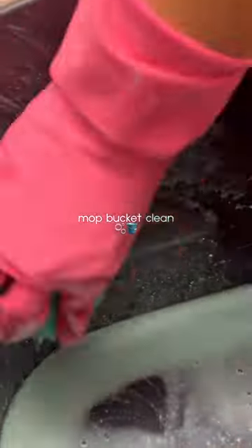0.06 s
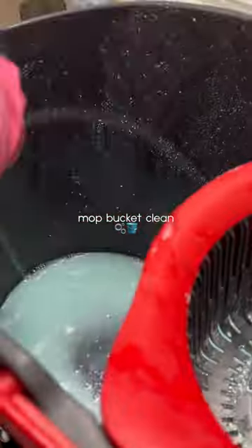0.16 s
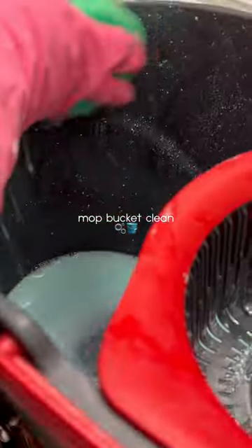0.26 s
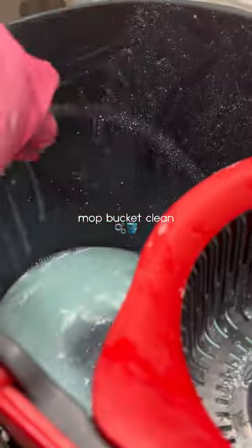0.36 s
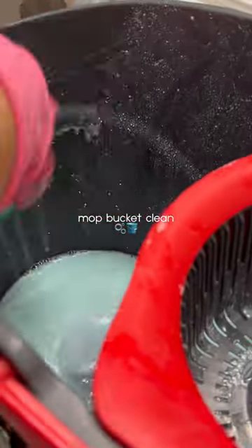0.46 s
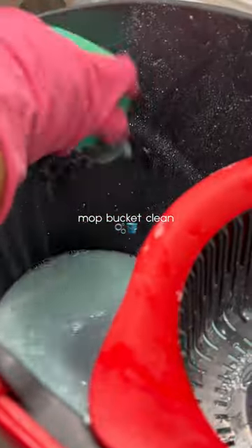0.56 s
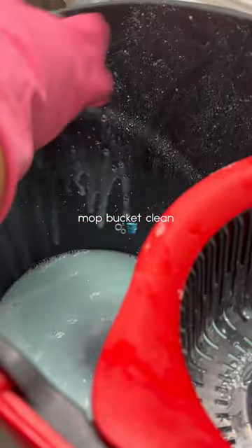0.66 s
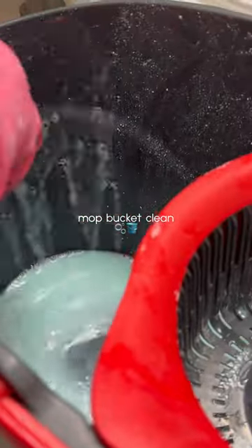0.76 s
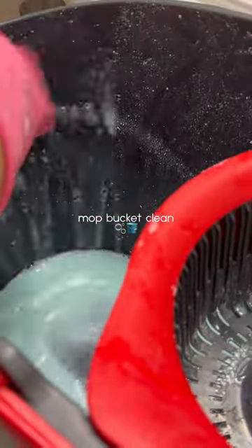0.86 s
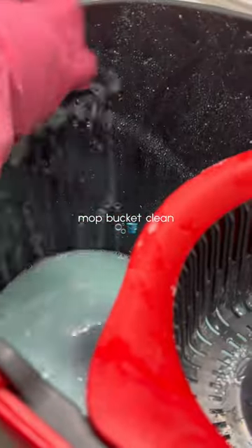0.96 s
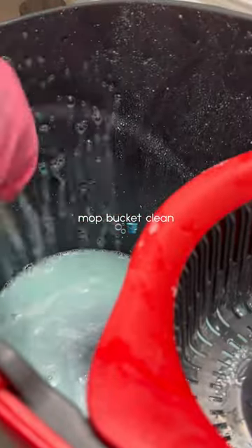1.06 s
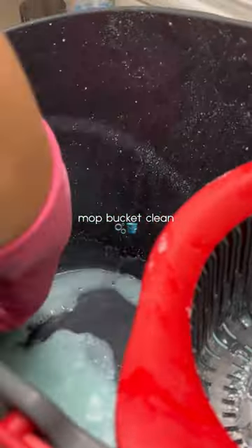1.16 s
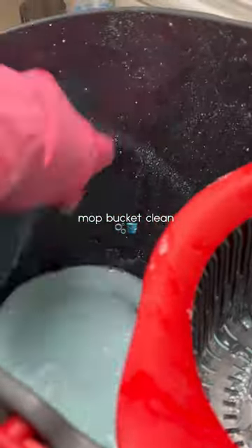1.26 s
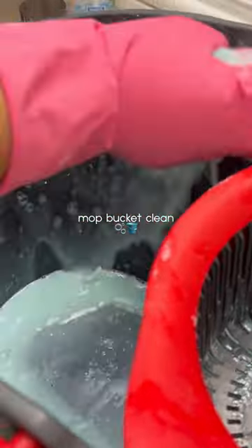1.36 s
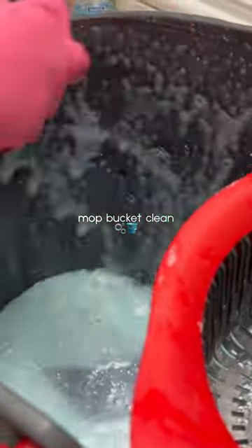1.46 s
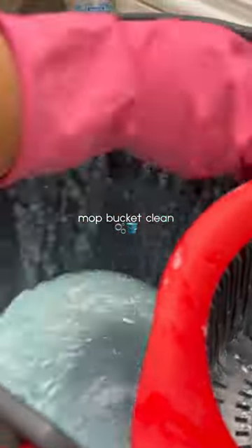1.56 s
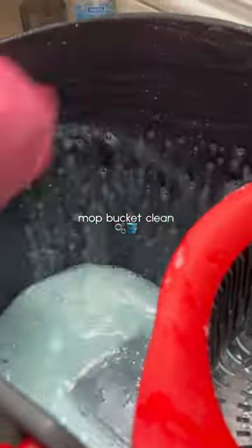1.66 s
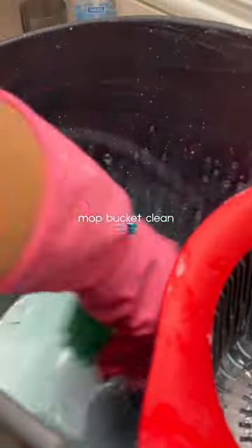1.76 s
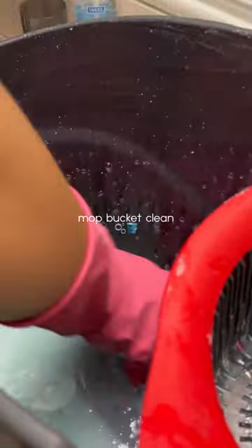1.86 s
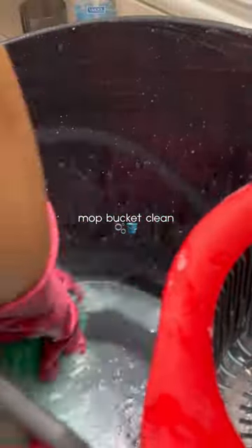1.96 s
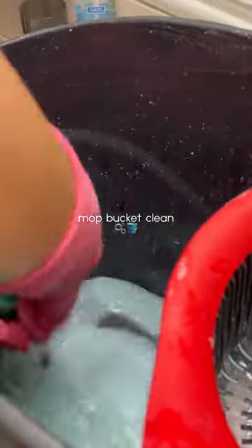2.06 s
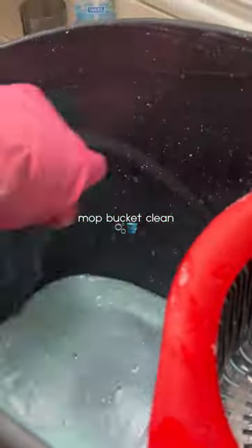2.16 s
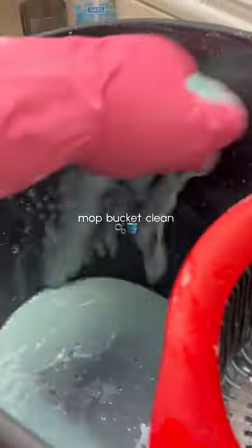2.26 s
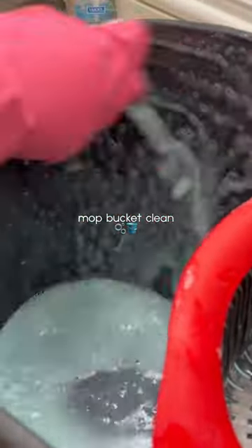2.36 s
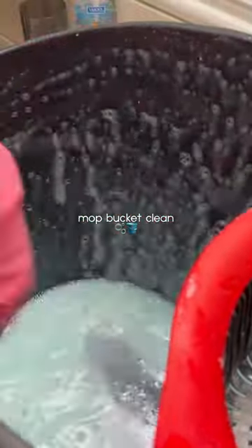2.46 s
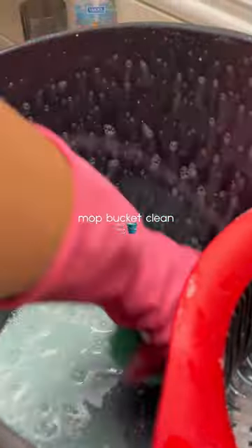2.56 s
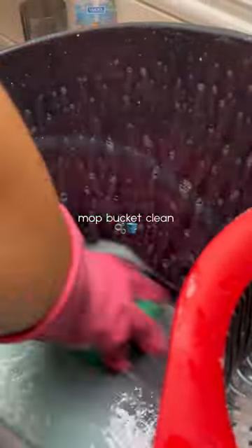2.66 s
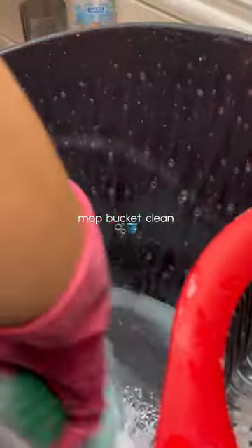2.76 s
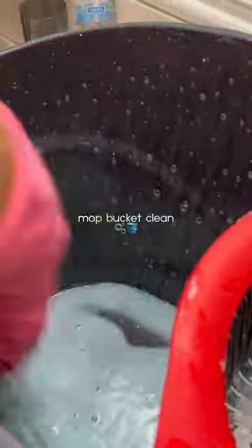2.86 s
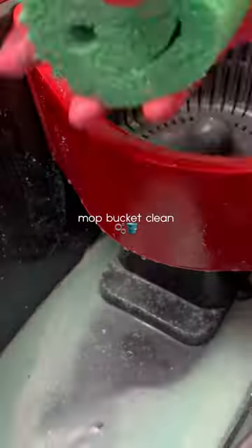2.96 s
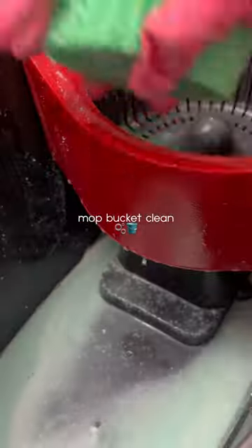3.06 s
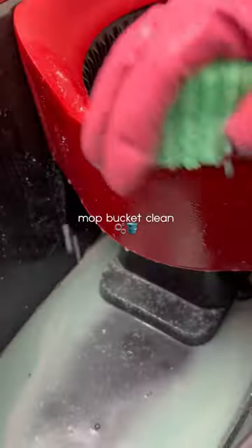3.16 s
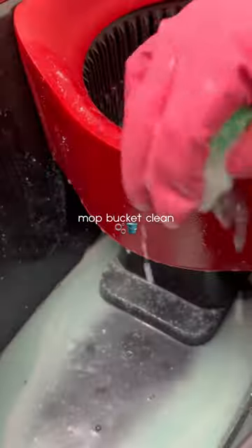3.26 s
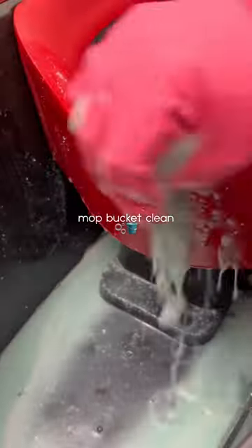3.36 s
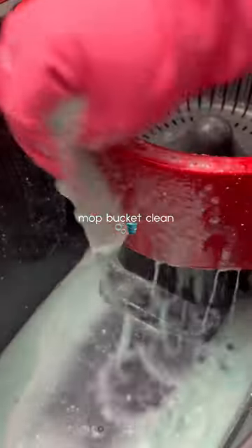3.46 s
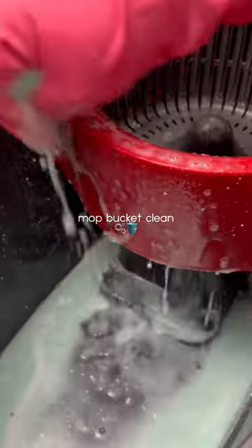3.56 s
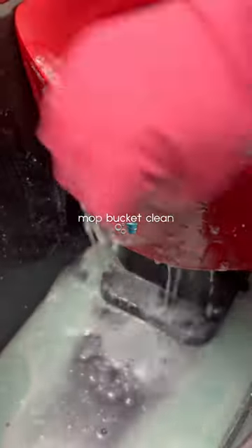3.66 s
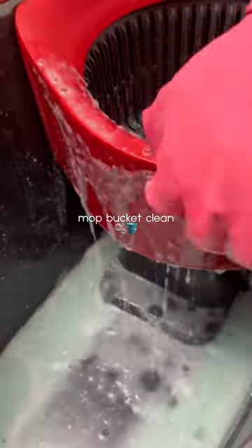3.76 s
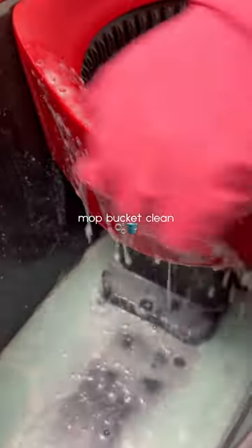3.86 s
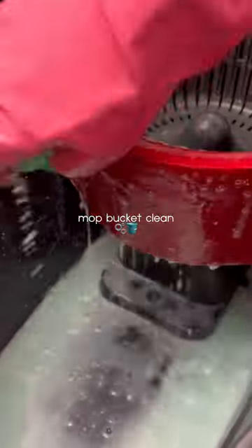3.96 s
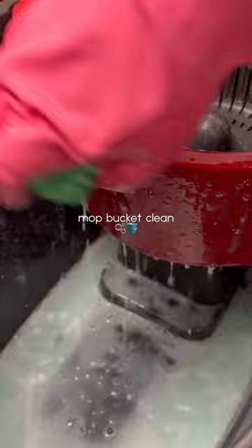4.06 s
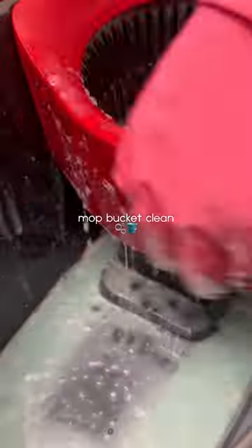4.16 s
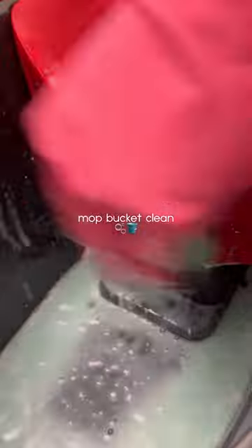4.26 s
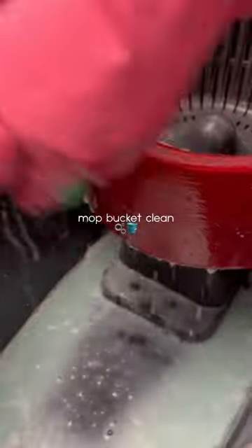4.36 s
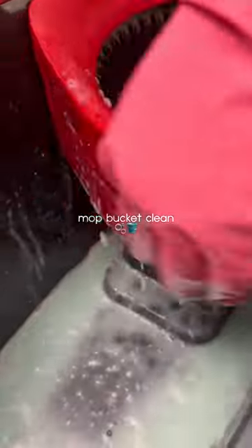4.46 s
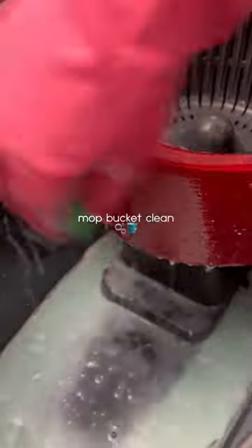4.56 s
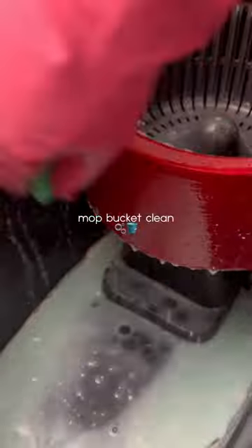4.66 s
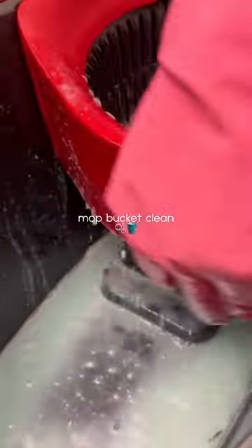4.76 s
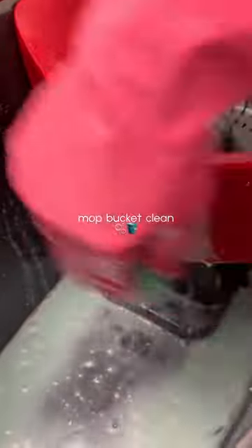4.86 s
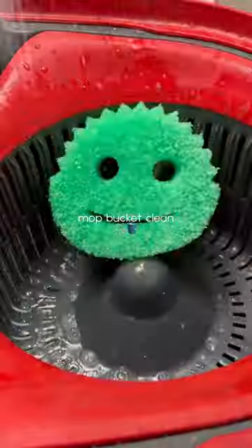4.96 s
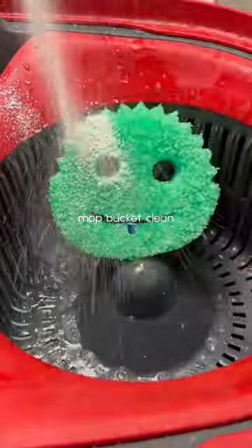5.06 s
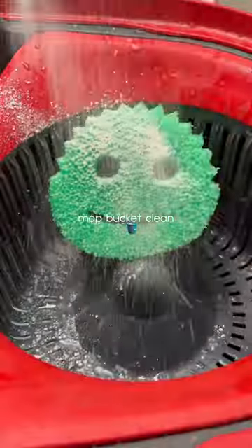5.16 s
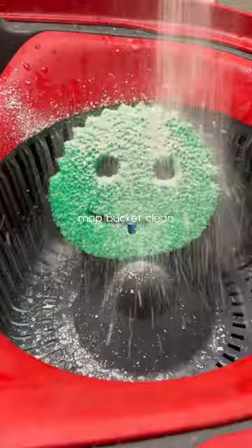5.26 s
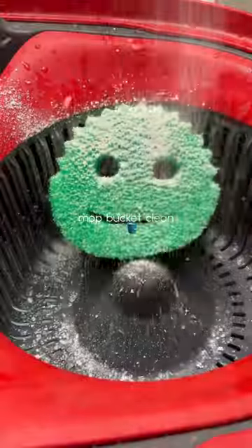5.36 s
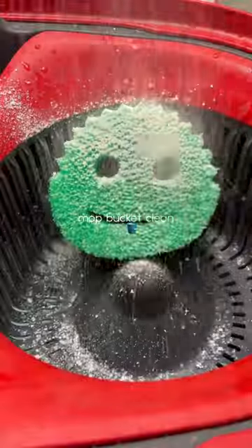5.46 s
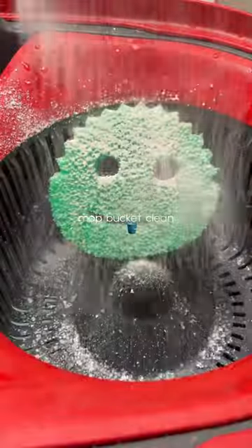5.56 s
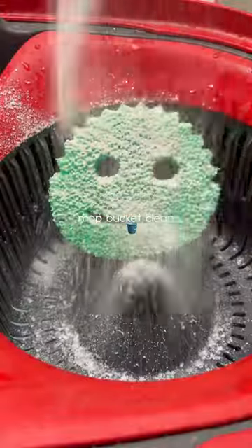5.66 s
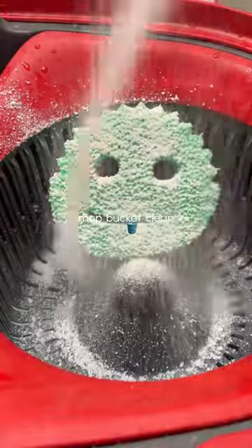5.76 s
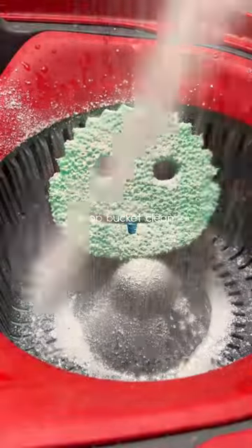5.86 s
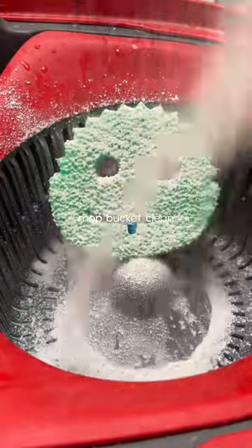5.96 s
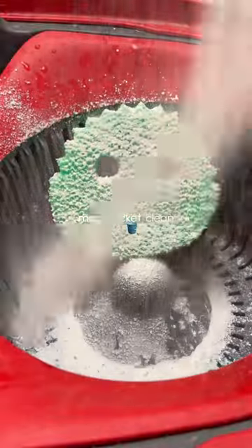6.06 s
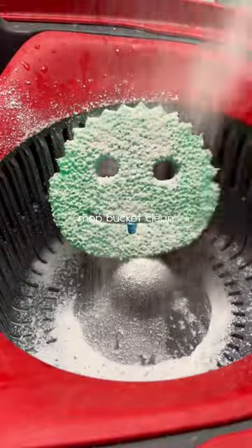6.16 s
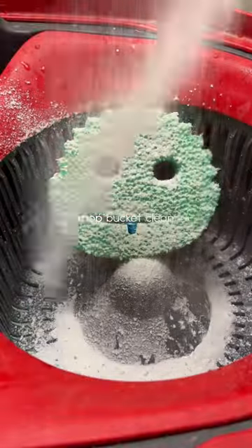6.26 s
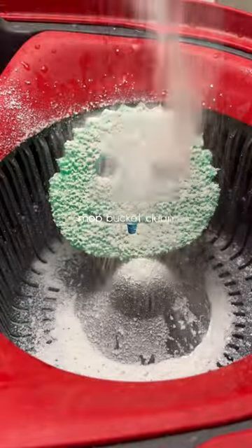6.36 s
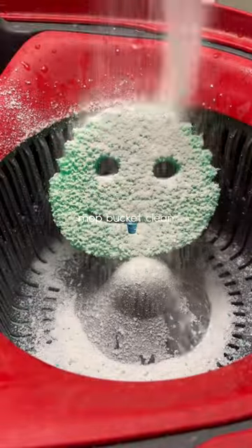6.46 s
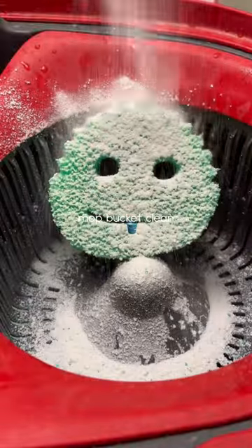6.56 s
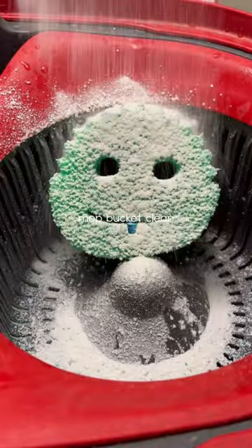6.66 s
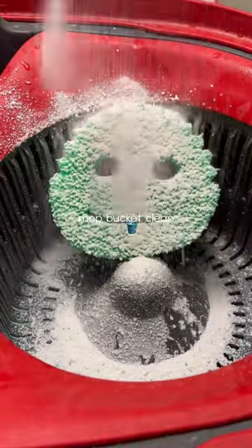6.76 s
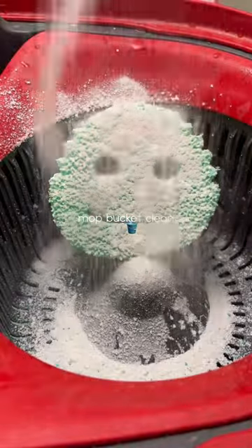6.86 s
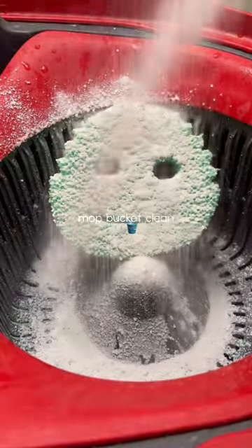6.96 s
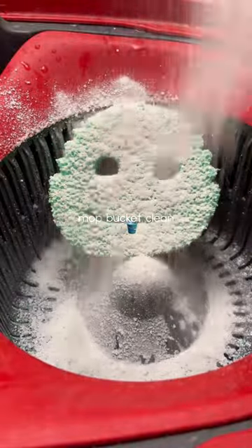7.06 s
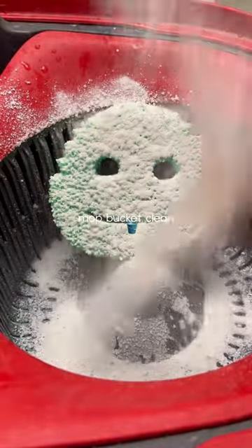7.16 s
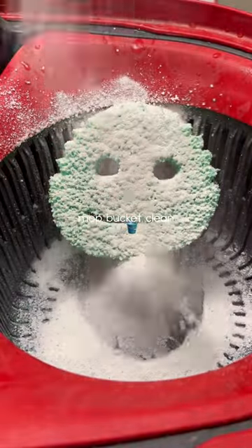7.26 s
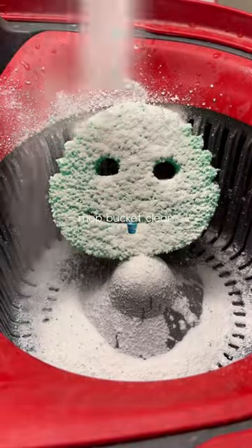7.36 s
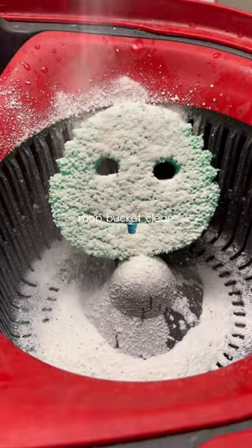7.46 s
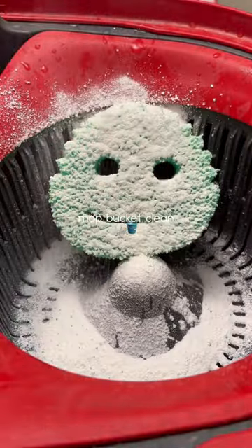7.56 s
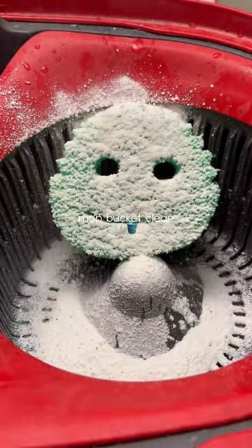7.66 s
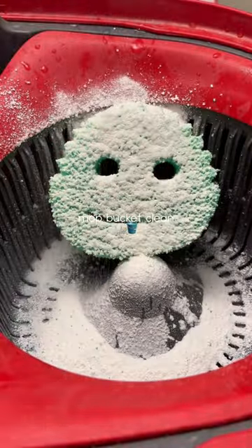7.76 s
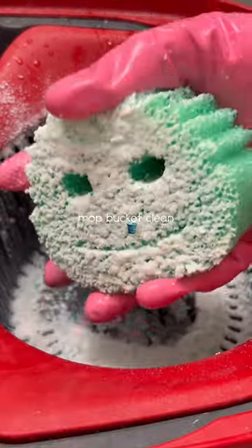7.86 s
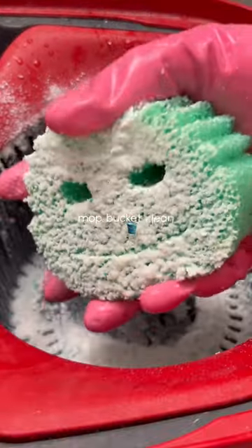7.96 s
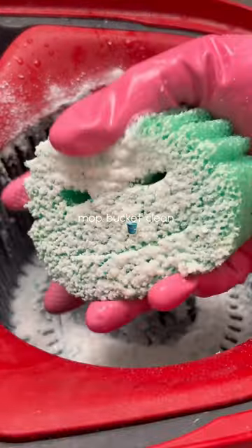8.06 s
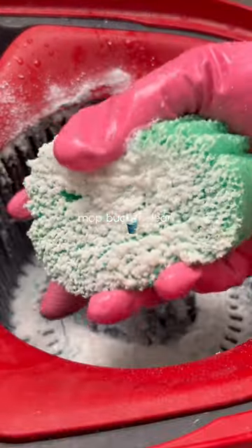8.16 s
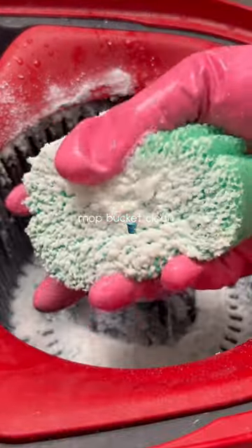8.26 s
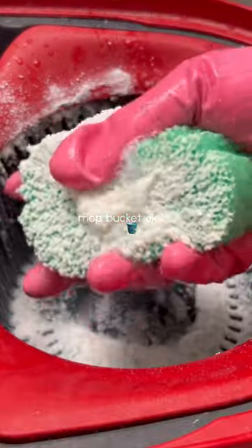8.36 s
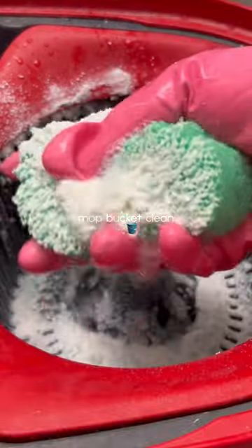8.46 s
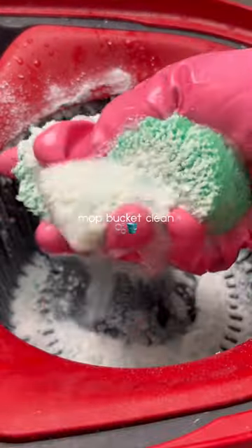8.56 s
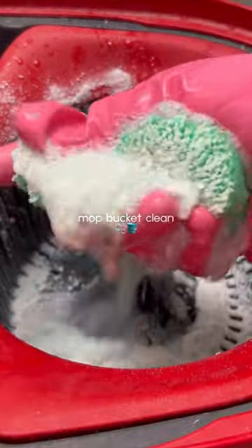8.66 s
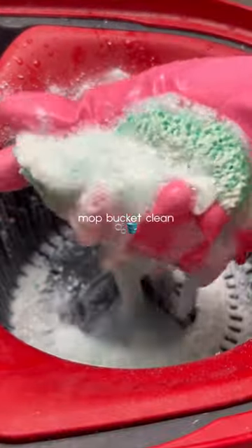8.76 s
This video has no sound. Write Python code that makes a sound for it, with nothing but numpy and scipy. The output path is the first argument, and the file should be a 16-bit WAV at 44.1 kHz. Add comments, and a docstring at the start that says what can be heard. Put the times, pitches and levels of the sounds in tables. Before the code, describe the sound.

Close in a small room, a coarse wet sponge scrubs a plastic bucket in fast uneven strokes, with hollow knocks, suds crackle and brief rubber-glove squeaks. Deeper, squelching scouring of the wringer follows, growing vigorous. After an abrupt dip, much quieter powder hisses and patters in shakes with tiny ticks over faint hum. Lastly the dusted sponge is squeezed, its crackling foam swelling.

```python
"""A coarse soapy sponge in a gloved hand scrubs a plastic mop bucket, close up in a small room,
in shots played at different speeds. It rasps and knocks on the wall, then scours the wringer, squelching.
Powder is shaken over it, and it is squeezed to crackling foam; a low hum joins these two parts.
Each rub is a shower of tiny random slips and hiss, coloured by the plastic under it.
Knocks are sums of bucket modes with a chirping crack; clicks and ticks are very short noise bursts."""
import sys
import numpy as np
from scipy import signal
from scipy.fft import rfft, irfft, next_fast_len
from scipy.io import wavfile
from scipy.ndimage import uniform_filter1d

SR = 44100
rng = np.random.default_rng(int(sys.argv[2]) if len(sys.argv) > 2 else 0)


def generate_wav(signal):
    """Clip the signal to [-1, 1] and save it as 16-bit WAV at the path in sys.argv[1]."""
    frames = np.transpose(np.atleast_2d(signal))
    scaled = np.clip(frames, -1, 1) * 32767
    pcm = np.round(scaled).astype(np.int16)
    wavfile.write(sys.argv[1], SR, pcm)


N = 388080
TIME = np.arange(N) / SR

# when each action goes on: (from [s], to [s])
SWIPING, SCRUBBING, SCOURING = (0, .126), (.126, 2.945), (2.945, 4.9)
POURING, SQUEEZING = (4.952, 7.77), (7.776, 8.8)


def amp(db):
    """Decibels to gain."""
    return 10 ** (np.asarray(db) / 20)


def evened(x):
    """Scales to rms 1."""
    return x / np.sqrt(np.mean(x ** 2) + 1e-20)


def read(points, hz):
    """Reads a table on a log-frequency axis."""
    f, value = np.transpose(points)
    return np.interp(np.log(hz + 1), np.log(f + 1), value)


def add(mix, s, sound):
    """Mixes a sound in at time s."""
    part = mix[max(round(s * SR), 0):][:len(sound)]
    part += sound[:len(part)]


def coloured(x, colour, peaks=(), size=2048):
    """Causal filter: a smooth spectrum with resonances on top, so that every click rings after it lands."""
    hz = np.fft.rfftfreq(size, 1 / SR)
    db = read(colour, hz)
    for f, width, lift in peaks:
        db = db + lift / (1 + (2 * (hz - f) / width) ** 2)
    log_gain = np.log(amp(np.r_[db, db[-2:0:-1]]))
    # minimum phase: the energy comes as early as this spectrum allows
    response = np.fft.ifft(np.exp(np.conj(signal.hilbert(log_gain)))).real
    return signal.oaconvolve(x, response)[:len(x)]


def wander(count, hz):
    """Random drift of rms 1, mostly slower than hz."""
    f = np.fft.rfftfreq(count, 1 / SR)
    return evened(irfft(rfft(rng.standard_normal(count)) / (1 + (f / hz) ** 4), count))


# playback speed of each shot, which scales bucket modes and port phase: (from [s], speed [ratio])
SHOT_SPEEDS = [(0, 1), (.125, 1.48), (2.95, .765), (4.935, 1), (7.772, .505)]
WALL_SPEED = 1.48  # the speed at which the bucket modes are heard at their listed frequency


def speed_at(s):
    """Playback speed of the shot at time s."""
    starts, speeds = np.transpose(SHOT_SPEEDS)
    return speeds[np.searchsorted(starts, s, "right") - 1]


# largest share by which high resonances shift, how fast [Hz], and the pitch [Hz] where half of it acts
PEAK_SWAY, SWAY_HZ, SWAY_ABOVE_HZ = .05, 4, 700


def swaying(x, colour, peaks):
    """Colours x with resonances that drift up and down as the point of contact moves."""
    versions = []
    for side in (-1, 1):
        moved = [(f * (1 + side * PEAK_SWAY * f / (f + SWAY_ABOVE_HZ)), width, lift)
                 for f, width, lift in peaks]
        versions.append(coloured(x, colour, moved))
    low, high = versions
    share = .5 + .5 * np.tanh(2 * wander(len(x), SWAY_HZ))
    return (1 - share) * low + share * high


def stroking(strokes, rise_s, fall_s):
    """Rasp and fizz gains: each stroke starts, swells or fades with the leaning hand, and slows to the turn."""
    rasp, fizz = np.zeros((2, N))
    for s, length, db, swell_db, fizz_db in strokes:
        t = np.arange(0, length, 1 / SR)
        ramps = np.minimum(t / rise_s, 1) * np.minimum((length - t) / fall_s, 1)
        gain = ramps * amp(db + swell_db * (t / length - .5))
        # overlapping strokes add as powers
        add(rasp, s, gain ** 2)
        add(fizz, s, (gain * amp(fizz_db)) ** 2)
    return np.sqrt(rasp), np.sqrt(fizz)


def loosely(gain, top_db, follow):
    """A level that reaches top_db with the gain and makes only a share of its swings."""
    return amp(top_db) * (gain / gain.max()) ** max(follow, .01)


def rub(span, gains, colour, peaks, grains_per_s, spread_db, hiss, judder_db, judder_hz, trim_db,
        edges_hz=(1100, 6000)):
    """Tiny uneven slips and hiss, juddering in level, ring the plastic; one gain a band, low to high."""
    first, last = round(span[0] * SR), min(round(span[1] * SR), N)
    count = last - first
    sizes = amp(spread_db * np.minimum(rng.exponential(1, count), 4))
    grains = sizes * rng.choice([-1, 1], count) * (rng.random(count) < grains_per_s / SR)
    judder = amp(judder_db * wander(count, judder_hz))
    drive = (evened(grains) + hiss * rng.standard_normal(count)) * judder
    size = next_fast_len(count)
    spectrum = rfft(swaying(drive, colour, peaks), size)
    hz = np.fft.rfftfreq(size, 1 / SR)
    # differences of low-passes split the spectrum into neighbouring bands
    bands = np.diff([1 / (1 + (hz / edge) ** 8) for edge in edges_hz], axis=0, prepend=0, append=1)
    sound = np.zeros(count)
    for band, gain in zip(bands, gains):
        sound += evened(irfft(spectrum * band, size)[:count]) * gain[first:last]
    return amp(trim_db) * np.pad(sound, (first, N - last))


# two quick strokes: (time [s], length [s], rasp level [dB], swell from start to end [dB],
# fizz over the rasp [dB])
SWIPE_STROKES = [(0.0, 0.055, -36.5, 4, 1), (0.052, 0.074, -36.5, 4.5, -1.5)]
# tone of the swipe: (frequency [Hz], level [dB per Hz])
SWIPE_TONE = [(50.0, -40), (100.0, -11), (170.0, -11), (300.0, -10.5), (550.0, -5), (900.0, -9.5),
              (1400.0, -16), (2200.0, -14.5), (3200.0, -13), (5000.0, -18.5), (7500.0, -23.5),
              (11000.0, -26.5), (15000.0, -27.5)]


def swipe(thrum_db=1):
    """A quick to and fro low on the wall: rubbing slips with no added resonances."""
    rasp, fizz = stroking(SWIPE_STROKES, rise_s=0.0013, fall_s=0.02)
    return rub(SWIPING, [rasp * amp(thrum_db), rasp, fizz], SWIPE_TONE, [], grains_per_s=4400,
               spread_db=2.5, hiss=0.82, judder_db=0.0, judder_hz=80, trim_db=0.0)


# tone of the room air: (frequency [Hz], level [dB per Hz])
AIR_TONE = [(20, -16), (60, -3.5), (150, 0), (400, -9.5), (2000, -17), (16000, -23.5)]
# mains hum, centre of its wavering pitch and level: (from [s], to [s], frequency [Hz], level [dB])
MAINS_HUMS = [(4.932, 7.782, 118.6, -67.5), (7.771, 8.792, 59.8, -71.5)]


def background(air_db=-80, waver_db=2.0, waver_hz=6, drift=0.0085):
    """Faint noise of room air, and a mains hum: a sine that wavers in level and pitch."""
    out = amp(air_db) * evened(coloured(rng.standard_normal(N), AIR_TONE))
    for start, end, hz, db in MAINS_HUMS:
        count = round((end - start) * SR)
        waver = signal.windows.tukey(count, .05) * amp(waver_db * wander(count, waver_hz))
        turns = np.cumsum(hz * (1 + drift * wander(count, waver_hz))) / SR
        add(out, start, np.sqrt(2) * amp(db) * waver * np.sin(2 * np.pi * turns))
    return out


BEND_S, BEND_POWER = .0026, 0.628  # delay of a 1 kHz bending wave; lower waves arrive later


def bending(colour, count):
    """One blow spreads through the wall as a falling chirp of energy 1: treble first, bass last."""
    hz = np.fft.rfftfreq(count, 1 / SR)
    delay_s = BEND_S * (1000 / np.maximum(hz, 100)) ** BEND_POWER
    spectrum = rfft(coloured(signal.unit_impulse(count), colour))
    # phase is the running sum of delay over frequency
    chirp = irfft(spectrum * np.exp(-2j * np.pi * np.cumsum(delay_s) * hz[1]), count)
    return chirp / np.linalg.norm(chirp)


# knocks on the bucket, relative levels: (time [s], clack level [dB], pitch of the struck patch [Hz],
# boom level [dB], crack level [dB])
BUCKET_KNOCKS = [(0.060, -27.5, 654, -29, -39), (0.157, -24, 248, -30, -57.5), (0.178, -21, 233, -40, -49),
                 (0.202, -38, 697, -27.5, -64), (0.236, -46, 819, -31.5, -44), (0.303, -33, 1040, -31, -53),
                 (0.317, -16.5, 338, -27.5, -29), (0.475, -27.5, 935, -29, -37.5),
                 (0.54, -24, 680, -28.5, -42), (0.5765, -19.5, 904, -23, -31.5),
                 (0.601, -28, 834, -48, -31), (0.624, -35, 860, -35, -39), (0.733, -11.5, 695, -18, -25.5),
                 (0.741, -14, 813, -22.5, -26), (0.769, -27, 1010, -34, -46), (0.884, -41, 326, -35.5, -48),
                 (0.929, -19.5, 729, -23, -32), (1.098, -22.5, 768, -28, -47),
                 (1.127, -22.5, 503.6, -27, -25.5), (1.325, -46, 213, -47, -58),
                 (1.415, -31, 819, -32.5, -42), (1.528, -5.5, 864, -14, -11),
                 (1.640, -33, 433, -36.5, -38.5), (1.662, -47, 1150, -42, -38),
                 (1.729, -31, 238, -40, -55.5), (1.821, -30.5, 720, -28.5, -34),
                 (1.984, -39, 870, -48, -32.5), (2.001, -49, 945, -29.5, -35.5),
                 (2.066, -23, 707.4, -40, -50), (2.302, -34, 196, -49, -69), (2.381, -36, 907, -39, -31),
                 (2.412, -32, 805, -32.5, -33), (2.604, -19.5, 858, -40, -34.5),
                 (2.653, -27, 881, -63, -39), (2.689, -27, 900, -52, -42), (2.697, -31, 906, -60, -40),
                 (2.984, -36.5, 563, -49, -47.5), (3.199, -31.5, 467, -51, -64),
                 (3.584, -29, 1480, -43, -36), (4.147, -21.5, 940, -49, -33), (4.34, -12, 398, -24, -24.5),
                 (4.554, -27, 405, -38, -45), (4.604, -26, 405, -29, -39), (4.745, -31, 400, -33, -29.5)]
# modes of the whole bucket before speed and detuning:
# (frequency [Hz], level [dB], time to fall 60 dB [s])
BODY_MODES = [(139, -6.5, .11), (164, 1.5, 0.12), (210, 1, .13), (259.3, -1.5, 0.1), (332, -3, 0.12),
              (413.4, 1.5, 0.095), (509, -5.5, 0.098), (674, -9.5, 0.18), (809, -12, 0.36),
              (883, -14, 0.098)]
# modes of the struck patch: (multiple of its pitch [ratio], level [dB])
STRUCK_MODES = [(.62, -10.5), (1.001, 1), (1.19, -5.5), (1.7, -12.5), (2.7, -21)]
# tone of the sharp crack: (frequency [Hz], level [dB per Hz])
CRACK_TONE = [(200, -23.5), (700, 6.5), (1500, 3.5), (3000, -1.5), (5000, -6.5), (8000, -19),
              (12000, -16.5), (16000, -18)]
# tone of the wet slap after a knock: (frequency [Hz], level [dB per Hz])
SLOP_TONE = [(100, -28.5), (250, -2), (400, 4.5), (600, -2), (900, 2), (1400, -9.5), (2500, -20.5),
             (8000, -35)]
SWING_S, SWING_HZ, SWING_POWER = 0.0025, 700, 0.32  # swing time of a 700 Hz patch; lower ones are slower


def knocks(clack_db=-2, boom_db=0.0, crack_db=1.0, snap_db=22.0, thud_db=20, slop_db=-7,
           crack_s=0.0024, boom_rise_s=0.0044, slop_s=0.02, detune=.06, linger=0.12, lowest_hz=105):
    """A chirping crack, a clack of the struck patch, a wet slap, and a boom detuned by the leaning hand."""
    out, t = np.zeros(N), np.arange(SR // 4) / SR
    usual_db = np.median([row[1] for row in BUCKET_KNOCKS])
    snap = amp(snap_db) * bending(CRACK_TONE, len(t))
    thud = amp(thud_db) * bending(SLOP_TONE, len(t))
    for s, clack, hz, boom, crack in BUCKET_KNOCKS:
        pace = speed_at(s) / WALL_SPEED  # the bucket sounds deeper in slower shots
        longer = amp(linger * max(clack - usual_db, 0))  # hard knocks swing longer
        swing_s = SWING_S * (SWING_HZ / hz) ** SWING_POWER
        swing = np.maximum(t / swing_s - .7, 0) / longer  # the wall first gives, then swings back
        patch = sum(amp(db) * np.sin(2 * np.pi * (hz * k * t + rng.random())) for k, db in STRUCK_MODES)
        body = np.zeros(len(t))
        for f, db, t60 in BODY_MODES:
            pitch = f * pace * (1 + detune * rng.uniform(-1, 1))
            body += amp(db - 60 * t / t60) * np.sin(2 * np.pi * (pitch * t + rng.random()))
        slop = evened(coloured(rng.standard_normal(len(t)), SLOP_TONE))
        slop = slop * amp(slop_db) * np.exp(-t / slop_s)
        grit = evened(coloured(rng.standard_normal(len(t)), CRACK_TONE))
        grit = grit * amp(crack_db) * t / crack_s * np.exp(1 - t / crack_s)
        boom_rise = 1 - np.exp(-t / (boom_rise_s * longer))
        sound = amp(clack + clack_db) * patch * swing * np.exp(1 - swing)
        sound = sound + amp(crack) * (snap + grit)
        sound = sound + amp(boom) * (thud + (amp(boom_db) * body + slop) * boom_rise)
        high_pass = signal.butter(4, lowest_hz * pace, "high", fs=SR, output="sos")
        add(out, s, signal.sosfilt(high_pass, sound))
    return out


# sponge strokes on the wall, relative levels: (time [s], length [s], rasp level [dB],
# swell from start to end [dB], fizz over the rasp [dB])
STROKES_ON_WALL = [(0.126, 0.19, -51, -1, 2), (0.304, 0.13, -45, 5, -2.5), (0.425, 0.14, -44, -3, -1),
                   (0.555, 0.16, -48.5, 0, -0.5), (0.715, 0.14, -44, -8, -5.5),
                   (0.838, 0.13, -44.5, -12.5, -6), (0.935, 0.17, -48, -3.5, 3.5),
                   (1.085, 0.14, -40.5, 3, -3), (1.195, 0.21, -48, -9, 2), (1.395, 0.092, -49, -3, 3.5),
                   (1.475, 0.2688, -45, -1, -0.5), (1.72, 0.08, -53.5, 4, -3.5),
                   (1.825, 0.15, -38, 12, -7.5), (1.955, 0.218, -43, 1, -1.5), (2.15, 0.1, -45, -10, 2),
                   (2.23, 0.28, -56.5, -2, 5), (2.36, 0.12, -45, 0, -3), (2.44, 0.14, -56, -12.5, -16),
                   (2.604, 0.23, -40.5, -4, -2), (2.815, 0.13, -44, 4, -1.5)]
# tone of rubbing the wall: (frequency [Hz], level [dB per Hz])
WALL_TONE = [(50.0, -31), (100.0, -22), (170.0, 2), (300.0, 1), (550.0, -5.5), (900.0, 0.5), (1400.0, -12),
             (2200.0, -13), (3200.0, -14.5), (5000.0, -14.5), (7500.0, -16.5), (11000.0, -20),
             (15000.0, -19)]
# resonances of the wall, centres of their sway: (frequency [Hz], width [Hz], lift [dB])
WALL_RESONANCES = [(182.4, 61, 0), (433, 130, 5.5), (716, 20, 10), (856, 33, 5.5), (3000, 580, 3.5)]
WALL_REST_DB, WALL_THRUM_DB = -60.5, -1.5  # the sponge resting on the wall; thrum over the rasp


def wall():
    """Uneven strokes over the wall, which thrums in step with the rasp."""
    rasp, fizz = np.hypot(stroking(STROKES_ON_WALL, rise_s=0.012, fall_s=.035), amp(WALL_REST_DB))
    return rub(SCRUBBING, [rasp * amp(WALL_THRUM_DB), rasp, fizz], WALL_TONE, WALL_RESONANCES,
               grains_per_s=3500, spread_db=2.0, hiss=.6, judder_db=1.55, judder_hz=130, trim_db=1.13)


def pops(span, gain, per_s, top_db, spread_db, low_hz, high_hz, ring_s):
    """Tiny ringing pops at random, each with its own pitch and size, the largest top_db over the gain."""
    start, end = span
    when, pitch, size = rng.random((4000, 3))[:round(per_s * (end - start))].T
    out, t = np.zeros(N), np.arange(SR // 250) / SR
    s = start + when * (end - start)
    hz = low_hz * (high_hz / low_hz) ** pitch
    heights = np.interp(s, TIME, gain) * amp(top_db - spread_db * size)
    for at, f, height in zip(s, hz, heights):
        add(out, at, height * np.cos(2 * np.pi * f * t) * np.exp(-t / ring_s))
    return out


def crackle():
    """Suds burst and bristles flick under the strokes, powder grains bounce, and the dusted sponge crunches."""
    on_wall = stroking(STROKES_ON_WALL, rise_s=.015, fall_s=0.033)[1] + amp(WALL_REST_DB)
    on_wringer = stroking(STROKES_ON_WRINGER, rise_s=0.031, fall_s=0.11)[1]
    falling = stroking(POWDER_SHAKES, rise_s=0.024, fall_s=0.046)[0]
    grip = amp(np.interp(TIME, *np.transpose(GRIP)))
    out = pops(SCRUBBING, on_wall, per_s=470, top_db=10, spread_db=13.5,
               low_hz=2400, high_hz=15000, ring_s=0.00078)
    out += pops(SCOURING, on_wringer, per_s=370, top_db=7, spread_db=11.5,
                low_hz=784, high_hz=6700, ring_s=0.00043)
    out += pops(POURING, falling, per_s=170, top_db=16.5, spread_db=14.5,
                low_hz=1480, high_hz=10090, ring_s=0.00026)
    out += pops(SQUEEZING, grip, per_s=160, top_db=10, spread_db=8.5,
                low_hz=1010, high_hz=9000, ring_s=0.0004)
    return out


# loud short broadband clicks, some of no known source, relative levels:
# (time [s], level [dB], top-octave sparkle level [dB])
LOUD_CLICKS = [(1.047, -35, -49), (1.355, -39, -49.5), (1.4468, -35, -40), (1.5102, -30, -42.5),
               (1.9188, -34, -48), (2.062, -46, -39), (2.267, -47, -39), (2.656, -27, -55),
               (3.010, -46.5, -59), (3.034, -48, -65), (3.3784, -43, -47), (3.3909, -25, -25),
               (3.5206, -22, -29), (3.5585, -23, -39.5), (3.7071, -29, -36), (3.983, -26.5, -50),
               (4.4859, -34, -31), (5.094, -42, -46.5), (5.166, -48.5, -54), (5.179, -39, -48),
               (5.2114, -45, -45), (5.218, -42, -42.5), (5.37, -52, -58), (5.4033, -36.5, -51),
               (5.4498, -44, -51), (5.482, -40, -50), (5.4872, -41, -46), (5.5516, -44, -54),
               (5.8145, -57, -40), (5.9813, -48, -34), (6.0861, -46, -36), (6.191, -54.5, -43),
               (6.2405, -40, -57), (6.5272, -23, -43), (6.533, -33.5, -51), (6.6067, -38, -63),
               (6.7633, -43.5, -64), (6.8347, -42, -58), (7.081, -47, -35), (7.347, -50, -56.5),
               (7.361, -46.5, -57), (7.506, -57, -64), (7.5238, -51, -51), (7.8407, -51, -60),
               (7.8627, -44, -60), (7.9161, -46, -50.5), (7.9535, -42.5, -58), (8.0064, -45, -49),
               (8.018, -50, -54), (8.0268, -38.5, -47), (8.0582, -38, -58), (8.1296, -38, -55),
               (8.2069, -41, -48), (8.3326, -47, -54), (8.5264, -49, -39)]
# spells of fainter random ticks, relative levels of the largest:
# (from [s], to [s], rate [ticks per s], level [dB], top-octave sparkle level [dB])
FAINT_SPELLS = [(0.301, 2.9, 6, -56, -48), (5.0, 6.4, 18, -48.5, -54.5), (6.1, 6.1, 12, -54, -61.5),
                (7.8, 11.3, 9, -49, -55)]
# tone of a tick: (frequency [Hz], level [dB per Hz])
TICK_TONE = [(60, -29), (200, -11), (550, -7), (1450, -11.5), (2300, 3.5), (3500, -1), (5000, -3),
             (10000, -1.5), (13000, -13)]
# tone of its sparkle: (frequency [Hz], level [dB per Hz])
SPARKLE_TONE = [(6000, -39.5), (10000, -4), (12500, -1), (16000, -3), (18000, -30.5)]


def ticks(level_db=1, sparkle_db=5, decay_s=0.0013, spread_db=6):
    """Loud clicks and faint random ticks: very short noise bursts with a sparkling top."""
    out, t = np.zeros(N), np.arange(SR // 20) / SR
    faint = []
    for start, end, per_s, db, sparkle in FAINT_SPELLS:
        for when, size in rng.random((64, 2))[:round(per_s * (end - start))]:
            softer_db = spread_db * size
            faint.append((start + when * (end - start), db - softer_db, sparkle - softer_db))
    for s, db, sparkle in list(LOUD_CLICKS) + faint:
        snap = evened(coloured(rng.standard_normal(len(t)), TICK_TONE))
        top = evened(coloured(rng.standard_normal(len(t)), SPARKLE_TONE))
        burst = amp(db + level_db) * snap + amp(sparkle + sparkle_db) * top
        add(out, s, burst * np.exp(-t / decay_s))
    return out


# squeaks of the wet glove, centre of the wavering pitch:
# (time [s], length [s], first pitch [Hz], last pitch [Hz], level [dB])
GLOVE_SQUEAKS = [(0.356, 0.016, 3780, 3940, -36), (1.16, 0.013, 3107, 3780, -30),
                 (1.174, 0.022, 3605, 2745, -30), (1.177, 0.043, 3560, 4020, -33.5),
                 (1.216, 0.037, 3700, 3520, -35.5), (1.904, 0.032, 5200, 5830, -39),
                 (2.101, 0.03, 4810, 5920, -29.5)]


def squeaks(waver=0.073, waver_hz=500):
    """Wet rubber catches on the wall: short rough whistles that glide."""
    out = np.zeros(N)
    for s, length, first_hz, last_hz, db in GLOVE_SQUEAKS:
        count = int(length * SR)
        pitch = np.linspace(first_hz, last_hz, count) * (1 + waver * wander(count, waver_hz))
        add(out, s, amp(db) * np.hanning(count) * np.sin(2 * np.pi * np.cumsum(pitch) / SR))
    return out


# sponge strokes on the wringer, relative levels: (time [s], length [s], rasp level [dB],
# swell from start to end [dB], fizz over the rasp [dB])
STROKES_ON_WRINGER = [(2.97, 0.244, -62.5, 16, 4), (3.16, 0.27, -48, 7, 6.5),
                      (3.372, 0.17, -44.5, -6.5, 11.5), (3.545, 0.18, -39.5, -1.5, 0),
                      (3.788, 0.2, -39.5, -12, 0.5), (3.985, 0.2, -40, 18, -1),
                      (4.195, 0.13, -28.5, -3.5, -0.5), (4.32, 0.15, -30, 0, -1),
                      (4.473, 0.15, -27.5, -6, -1), (4.618, 0.16, -28.5, -2.5, -1),
                      (4.773, 0.17, -28, -7.5, -0.5)]
# tone of rubbing the wringer: (frequency [Hz], level [dB per Hz])
WRINGER_TONE = [(50.0, -37), (100.0, -4), (170.0, -3), (300.0, -1), (550.0, -5.5), (900.0, 2), (1400.0, 2),
                (2200.0, -5.5), (3200.0, -4), (5000.0, -7.5), (7500.0, -6.5), (11000.0, -9), (13600.0, -10),
                (15000.0, -27)]
# resonances of the wringer, centres of their sway: (frequency [Hz], width [Hz], lift [dB])
WRINGER_RESONANCES = [(87, 41, 3.6), (208, 30, 5.5), (401, 60, 6.6), (877, 98, 4), (1930, 370, 3.9),
                      (3150, 170, 4.8)]
# pressure of the wet sponge on the wringer, heard as a relative squelch: (time [s], level [dB])
PRESSURE = [(2.96, -56.5), (3.12, -59), (3.22, -49.5), (3.34, -36), (3.55, -37.5), (3.7, -34.5),
            (3.78, -40), (3.86, -38.5), (4.0, -36.5), (4.25, -39), (4.37, -36), (4.6, -35.5), (4.9, -39)]


def wringer(squelch_db=1, body_db=-31, body_follow=0.52, rasp_db=0.4, fizz_db=-1.3,
            turn_body_db=-10, turn_rasp_db=-17, turn_fizz_db=-16):
    """Strokes rasp on the wringer, higher bands swinging most; the sponge squelches on through the turns."""
    rasp, fizz = stroking(STROKES_ON_WRINGER, rise_s=0.046, fall_s=0.059)
    squelch = amp(np.interp(TIME, *np.transpose(PRESSURE)) + squelch_db)
    body = loosely(rasp, body_db, body_follow) * np.sqrt(squelch / squelch.max())
    gains = [squelch,
             np.hypot(body, squelch * amp(turn_body_db)),
             np.hypot(rasp * amp(rasp_db), squelch * amp(turn_rasp_db)),
             np.hypot(fizz * amp(fizz_db), squelch * amp(turn_fizz_db))]
    return rub(SCOURING, gains, WRINGER_TONE, WRINGER_RESONANCES, grains_per_s=4000, spread_db=0.5,
               hiss=0.61, judder_db=0.76, judder_hz=140, trim_db=-0.5, edges_hz=(600, 1900, 5500))


def glugs(count=80, low_hz=190, high_hz=650, cycles=3.1, rise=3, level_db=3, spread_db=10):
    """Air pockets glug out of the wet sponge with rising pitch, following its pressure on the wringer."""
    start, end = SCOURING
    out, t = np.zeros(N), np.arange(SR // 16) / SR
    for k, (jitter, pitch, size) in enumerate(rng.random((count, 3))):
        at = start + (end - start) * (k + jitter) / (count + 1)
        hz = low_hz * (high_hz / low_hz) ** pitch
        age = t * hz / cycles
        db = np.interp(at, *np.transpose(PRESSURE)) + level_db - spread_db * size
        tone = np.sin(2 * np.pi * hz * t * (1 + rise * t))
        add(out, at, amp(db) * age * np.exp(1 - age) * tone)
    return out


# shakes of powder, relative levels: (time [s], length [s], patter level [dB],
# swell from start to end [dB], fizz over the patter [dB])
POWDER_SHAKES = [(4.95, 0.43, -57, -1.5, 3), (5.35, 0.42, -61.5, 1, 4), (5.76, 0.38, -62.5, -2, 4.5),
                 (6.14, 0.32, -66, -1, 4), (6.41, 0.16, -59, 16, 2), (6.53, 0.16, -60.5, -5, -1),
                 (6.67, 0.35, -66, 1, 1.5), (6.93, 0.28, -64.5, 6.5, 6), (7.2, 0.24, -67, -1, 4.5),
                 (7.45, 0.25, -71, -4.5, -3)]
# tone of falling powder: (frequency [Hz], level [dB per Hz])
POWDER_TONE = [(50.0, -37), (100.0, -4), (170.0, -4), (300.0, -8), (550.0, -10), (900.0, -11.5),
               (1400.0, -4), (2200.0, -5.5), (3200.0, -6), (5000.0, -3), (7500.0, -2.5), (11000.0, 3),
               (15000.0, -1)]
# resonances of the basket: (frequency [Hz], width [Hz], lift [dB])
BASKET_RESONANCES = [(560, 102, 9.2), (1160, 100, 8.9), (2180, 190, 7.5), (3227, 250, 7.7),
                     (3900, 470, 1.6)]
POWDER_HISS = .65  # smooth hiss of the finest dust, relative to the separate grains


def powder(thrum_db=-64.5, thrum_follow=0.3, fizz_db=3.2, trickle_db=-78):
    """Powder grains shower sponge and basket, shake by shake; the basket's low ring follows only loosely."""
    patter, fizz = np.hypot(stroking(POWDER_SHAKES, rise_s=0.0089, fall_s=0.042), amp(trickle_db))
    gains = [loosely(patter, thrum_db, thrum_follow), patter, fizz * amp(fizz_db)]
    return rub(POURING, gains, POWDER_TONE, BASKET_RESONANCES, grains_per_s=1400, spread_db=1.5,
               hiss=POWDER_HISS, judder_db=1.4, judder_hz=35, trim_db=2.07)


# the heaviest clumps of powder landing on the basket, relative levels: (time [s], level [dB])
HEAVY_CLUMPS = [(5.144, -49), (5.403, -52), (5.622, -52.5), (6.079, -51.5), (6.53, -43.5), (6.914, -52),
                (6.97, -52), (7.009, -51), (7.035, -61), (7.102, -47), (7.122, -50.5), (7.147, -48),
                (7.165, -50), (7.185, -55), (7.23, -51)]
# tone of a clump: (frequency [Hz], level [dB per Hz])
CLUMP_TONE = [(100, -26), (280, -22.5), (600, 5.5), (1200, -6.5), (2500, -8), (8000, -32)]


def clumps(level_db=-2, swell_s=0.0054, count=20, small_db=-57.0, spread_db=6):
    """Soft lumps of powder thud on the basket and sound its resonances; small ones fall at random."""
    out, t = np.zeros(N), np.arange(SR // 8) / SR
    start, end = POURING
    small = [(start + (end - start) * (k + jitter) / (count + 1), small_db - spread_db * size)
             for k, (jitter, size) in enumerate(rng.random((count, 2)))]
    for s, db in list(HEAVY_CLUMPS) + small:
        thud = evened(coloured(rng.standard_normal(len(t)), CLUMP_TONE, BASKET_RESONANCES))
        add(out, s, amp(db + level_db) * thud * t / swell_s * np.exp(1 - t / swell_s))
    return out


# grip on the sponge, heard as a relative crackle: (time [s], level [dB])
GRIP = [(7.78, -74.5), (7.882, -66.5), (8.05, -59.5), (8.17, -59.5), (8.31, -52), (8.472, -47.5),
        (8.8, -47)]
# tone of the foam: (frequency [Hz], level [dB per Hz])
FOAM_TONE = [(50.0, -13.5), (100.0, -5), (170.0, -7.5), (300.0, -6), (550.0, -3), (900.0, -9), (1400.0, -2),
             (2200.0, 0.5), (3200.0, -4.5), (5000.0, -2.5), (7500.0, -7), (11000.0, -9), (15000.0, -14.5)]
# resonances around the foam, centres of their sway: (frequency [Hz], width [Hz], lift [dB])
FOAM_RESONANCES = [(284, 66, 11.3), (1013, 200, 10.6), (1440, 260, 4.3), (1810, 170, 2), (3070, 280, 4.6)]


def foam(thrum_db=-3, thrum_follow=0.75, fizz_db=-3.0):
    """Bubbles crackle louder as the grip tightens: slips and hiss, the low band swinging less."""
    s, grip_db = np.transpose(GRIP)
    mean_db = grip_db.mean()
    low_db = thrum_db + mean_db + thrum_follow * (grip_db - mean_db)
    gains = [amp(np.interp(TIME, s, db)) for db in (low_db, grip_db, grip_db + fizz_db)]
    return rub(SQUEEZING, gains, FOAM_TONE, FOAM_RESONANCES, grains_per_s=2200, spread_db=3.0,
               hiss=1.0, judder_db=-0.4, judder_hz=59.7, trim_db=3.5)


# how fast the room's echo dies away: (frequency [Hz], time to fall 60 dB [s])
ROOM_FADE = [(100, 0.4), (500, 0.25), (2000, 0.11), (8000, 0.13), (16000, 0.027)]


def surroundings(x, bucket_db=-12, bucket_t60=0.08, bucket_hz=1500, room_db=-18, shifts_per_s=5, count=4):
    """Direct sound, plus bucket scatter of the treble and a short room tail along paths that shift in turn."""
    t = np.arange(SR // 2) / SR
    out, turn = x, TIME * shifts_per_s
    high_pass = signal.butter(2, bucket_hz, "high", fs=SR, output="sos")
    for k in range(count):
        scatter = rng.standard_normal(len(t)) * amp(-60 * t / bucket_t60)
        scatter = signal.sosfilt(high_pass, scatter)
        hz, when, z = signal.stft(rng.standard_normal(len(t)), SR, nperseg=256)
        fade = amp(-60 * when / read(ROOM_FADE, hz)[:, None])
        tail = signal.istft(z * fade, SR, nperseg=256)[1][:len(t)]
        tail = tail * (t > .006)  # the room answers after 6 ms
        response = amp(bucket_db) * scatter / np.linalg.norm(scatter)
        response = response + amp(room_db) * tail / np.linalg.norm(tail)
        share = np.sin(np.pi / 2 * np.minimum((turn - k) % count, 2))
        out = out + signal.oaconvolve(x * share, response)[:N]
    return out / np.sqrt(1 + amp(bucket_db) ** 2 + amp(room_db) ** 2)


def patches(shape):
    """A random field of rms 1, smooth over some 500 Hz and 20 ms."""
    smooth = uniform_filter1d(rng.standard_normal(shape), size=3, axis=0)
    return evened(uniform_filter1d(smooth, size=7, axis=1))


# phase between the two microphone ports at speed 1: (frequency [Hz], phase [radians])
PHASE_BETWEEN_PORTS = [(0, 0), (400, -.38), (1000, -.72), (2000, -.35), (3300, 0), (5000, 2.4), (7300, 1),
                       (8600, 1.7), (9700, 1.2), (10700, 3.1), (11600, 3.2), (14200, 6.2), (15800, 6.3),
                       (19000, 9.3), (21000, 9.5), (24000, 12.5), (26000, 12.6), (29000, 15.6)]


def ports(x, shadow_db=3.5, short_wave_hz=700):
    """Two ports hear the sound out of phase; the pattern stretches in frequency with each shot's speed."""
    both = np.array([surroundings(x), surroundings(x)])
    hz, t, (a, b) = signal.stft(both, SR, nperseg=256)
    half = np.interp(hz[:, None] / speed_at(t), *np.transpose(PHASE_BETWEEN_PORTS)) / 2
    # the moving hand keeps changing the paths out of the bucket, mostly for short waves
    short = (hz / (hz + short_wave_hz))[:, None]
    shadow = amp(shadow_db * short * patches(a.shape))
    turn = np.exp(.7j * short * patches(a.shape))
    mid = np.cos(half) * a * shadow
    side = 1j * np.sin(half) * b * shadow * turn
    return signal.istft(np.array([mid + side, mid - side]), SR, nperseg=256)[1][:, :N]


# overall level, which dips briefly after the scouring; end values hold outside: (time [s], level [dB])
LEVEL_DIP = [(4.893, -5), (4.905, -23), (4.94, -19), (4.953, -5)]


def scene():
    """Everything happens in the bucket, just below the microphone."""
    rubbing = swipe() + wall() + wringer() + powder() + foam()
    details = crackle() + glugs() + clumps() + knocks() + squeaks() + ticks()
    level = amp(np.interp(TIME, *np.transpose(LEVEL_DIP)))
    balance = amp([[-.12], [.12]])  # left, right
    return ports(rubbing + details + background()) * level * balance


def record(dry):
    """Steep low-pass: nothing is heard above 15.9 kHz."""
    low_pass = signal.firwin(511, 15900, window=("kaiser", 9), fs=SR)
    return signal.oaconvolve(dry, low_pass[None], "same")


dry = scene()
out = record(dry)
generate_wav(out)
```